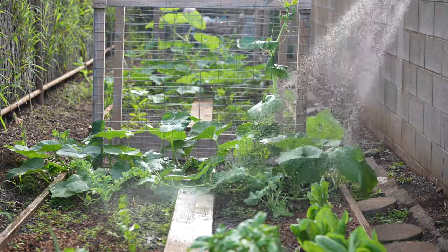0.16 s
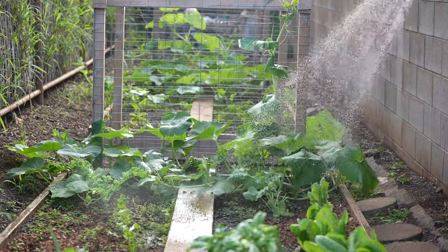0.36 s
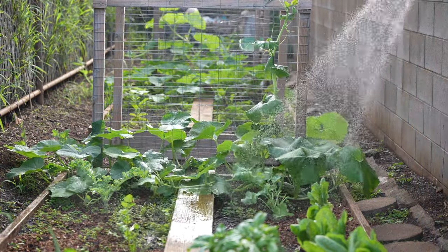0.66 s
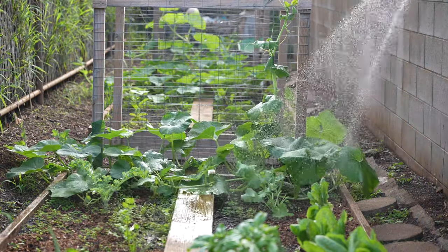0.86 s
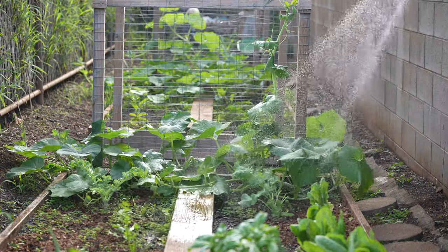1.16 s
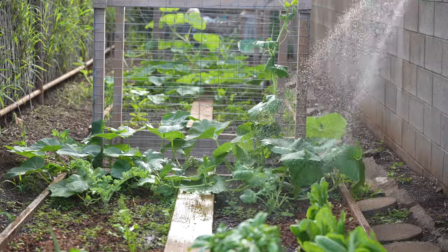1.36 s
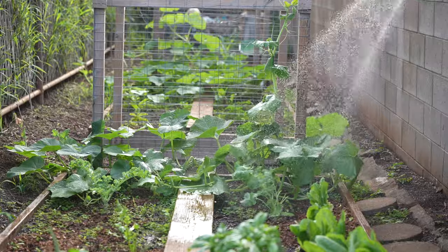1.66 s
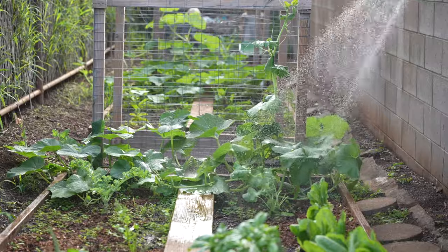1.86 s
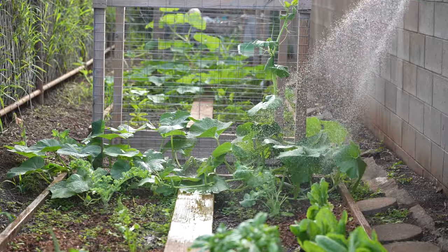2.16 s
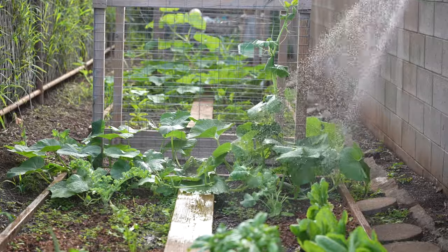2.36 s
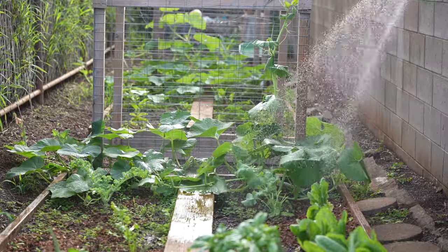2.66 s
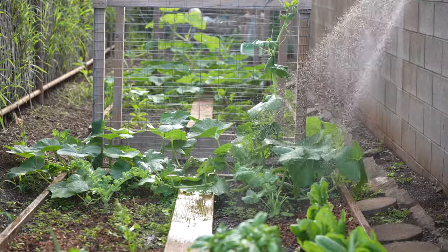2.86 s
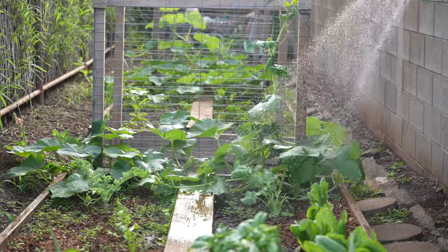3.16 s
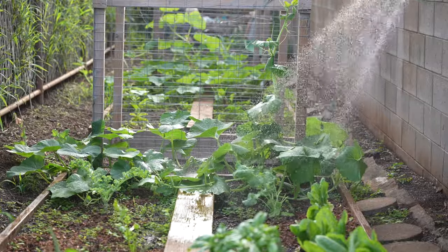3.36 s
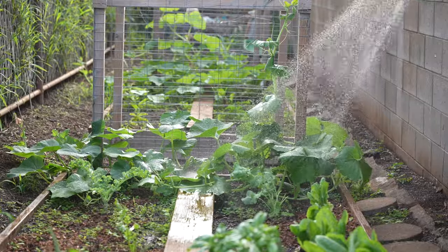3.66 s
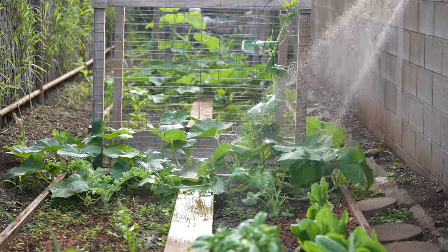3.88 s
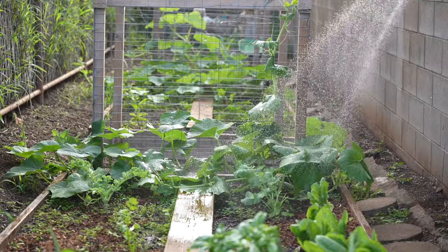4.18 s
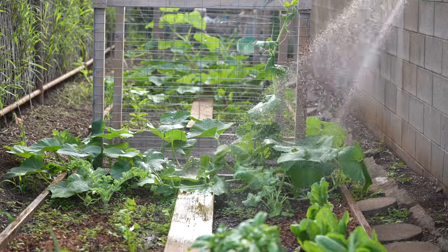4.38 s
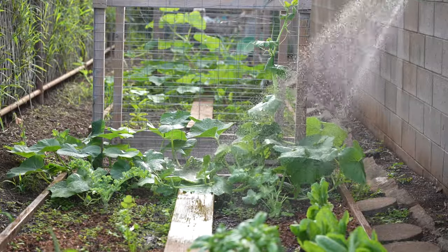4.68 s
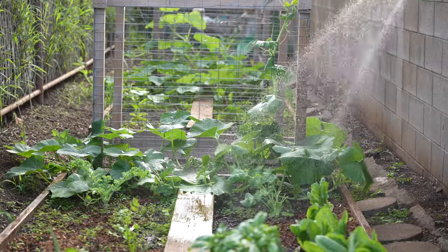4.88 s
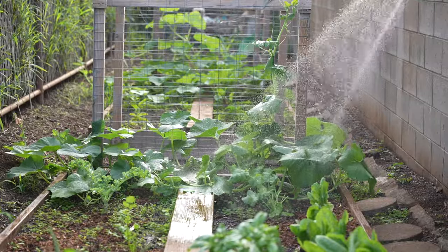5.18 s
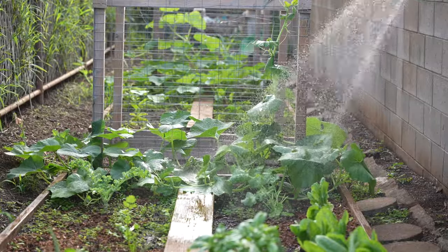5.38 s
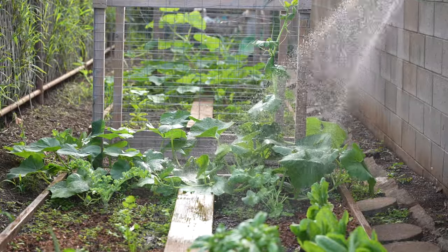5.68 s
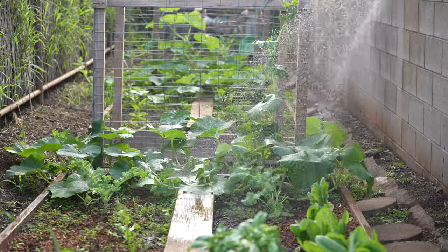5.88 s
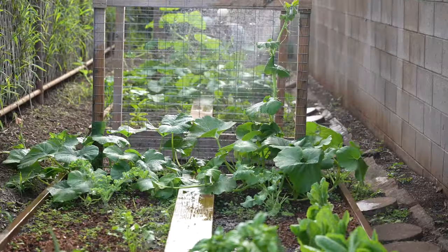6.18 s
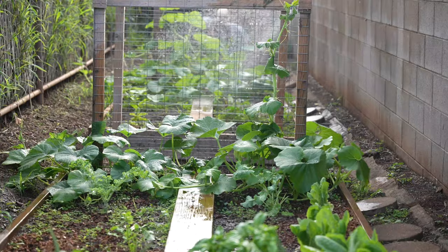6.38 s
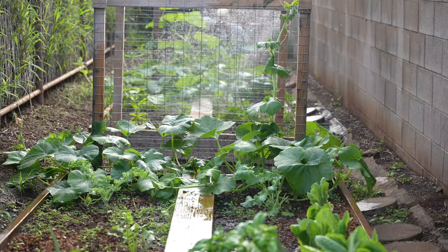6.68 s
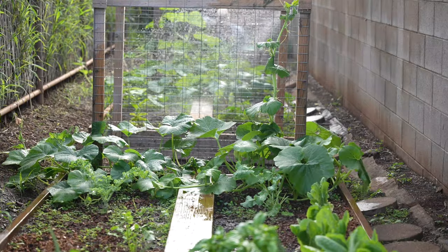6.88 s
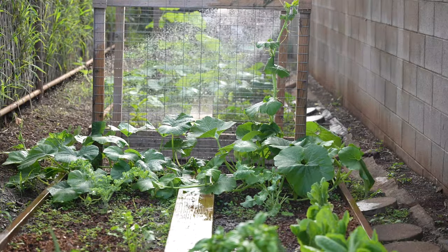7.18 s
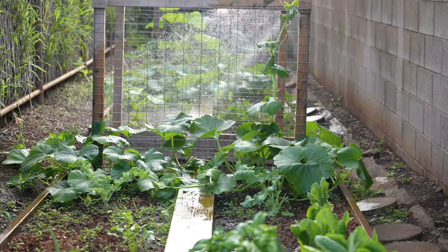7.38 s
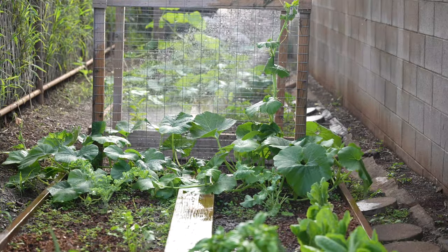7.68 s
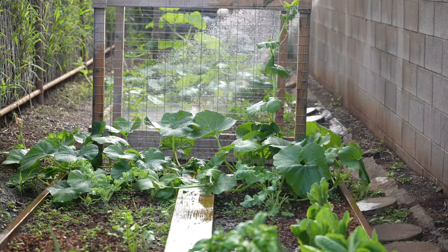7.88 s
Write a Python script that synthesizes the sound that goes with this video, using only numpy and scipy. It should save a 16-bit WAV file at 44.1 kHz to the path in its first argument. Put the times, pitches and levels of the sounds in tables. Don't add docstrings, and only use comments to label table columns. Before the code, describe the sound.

A bright, nearly constant water spray, slightly stronger on the right, wets leaves and ground close to a small camera. Low wind blasts and sharp flapping thuds hit its unprotected microphone, densest in the early part, then easing. A short descending bird whistle sounds faintly before an abrupt scene change; the spray moves further back, traffic rumble increases, and fresh gusts bump the microphone over a faint motor hum.

```python
import sys
import numpy as np
from scipy import signal
from scipy.fft import rfft, irfft, next_fast_len
from scipy.io import wavfile
from scipy.ndimage import uniform_filter1d

SR = 44100
rng = np.random.default_rng(int(sys.argv[2]) if len(sys.argv) > 2 else 0)


def to_wav(sig):
    pcm = np.clip(np.atleast_2d(sig), -1, 1) * 32767
    pcm = np.round(pcm).astype(np.int16)
    wavfile.write(sys.argv[1], SR, pcm.T)


def makeup_ratio(level_db):
    decades = np.asarray(level_db, float) / 20
    return 10 ** decades


N = 354563
T = np.arange(N) / SR
M = next_fast_len(N)
HZ = np.arange(M // 2 + 1) * SR / M + 1e-3

CUT_S = 6.205
TOWN_NEAR_DB, TOWN_FAR_DB = -18, -8.5
NOZZLE_NEAR_DB, NOZZLE_FAR_DB = -25.7, -28.3
SPLASH_NEAR_DB, SPLASH_FAR_DB = -5.4, -7.6
SPLASH_FOLLOWS = .95
SWAY_DB = -0.76
BREEZE_NEAR_DB, BREEZE_FAR_DB = (-43, -50, -56), (-33, -43, -48)
EDDY_LAG_S = 0.0012
DUCK_ATTACK_S, DUCK_RETURN_S, CREEP_DB_PER_S = .03, .05, 2.9
TOP_HZ = 15760

# (frequency [Hz], density [dB per Hz])
TOWN_COLOUR = [(41, -34), (70, -1), (79, 4), (87, 1), (129, -2.5), (313, -14.5), (500, -33), (650, -43),
               (1100, -120)]
# (time [s], pitch [Hz], level [dB])
MOTOR_DRONE = [(0, 61.5, -31.5), (.4, 62.3, -40.5), (.6, 62.8, -25.5), (.9, 62.5, -30.5),
               (1.1, 63.2, -32.5), (1.35, 62.8, -36.5), (3.1, 62.2, -39), (3.6, 62.3, -29.5),
               (4.25, 63, -36.5), (4.5, 62.9, -50), (4.8, 63.4, -37), (5.25, 62.7, -46), (5.9, 63.2, -38),
               (6.2, 62, -51)]
# (time [s], pitch [Hz], level [dB])
MOTOR_HUM = [
    (6.21, 321, -59),
    (6.8, 321, -53),
    (6.95, 322, -52),
    (7.2, 321, -48.5),
    (7.4, 321, -55),
    (7.6, 321, -47),
    (8.04, 321, -59),
]
# (time [s], pitch [Hz], level [dB])
BIRD_WHISTLE = [
    (5.15, 2520, -57),
    (5.2, 2500, -48),
    (5.22, 2400, -48),
    (5.25, 2370, -41),
    (5.31, 2340, -41),
    (5.34, 2360, -50),
    (5.38, 2330, -43),
    (5.46, 2250, -41),
    (5.48, 2230, -58),
]
# (frequency [Hz], density [dB per Hz])
GUST_COLOUR = [(7.1, -39), (12, 2), (38, 0), (137, -9.5), (240, -16), (299, -22.5), (413, -27),
               (490, -35.5), (700, -30.5), (910, -41), (1540, -120)]
# (time [s], time to fall 10 dB [s], level [dB])
AIR_HEAVES = [(.29, .2, -32), (.47, 0.2, -30), (.59, 0.2, -30), (1.03, -0.2, -33), (1.23, 0.08, -26.5),
              (1.5, 0.1, -26), (1.59, .06, -20), (1.72, 0.17, -17.5), (1.98, 0.13, -24),
              (2.12, 0.05, -19.5), (2.23, 0.02, -20), (2.35, 0.06, -22), (2.47, 0.14, -29),
              (2.69, .06, -26), (2.85, .17, -25), (3.24, .06, -30), (3.56, 0, -24.5), (3.71, 0.04, -20.5),
              (3.83, 0, -20.5), (3.94, -0.06, -19), (4.68, 0.6, -28), (4.95, 0, -31.5), (5.62, .15, -34),
              (6.22, .07, -29), (6.42, .15, -26), (6.61, 0.02, -16.5), (6.87, 0.04, -17.5),
              (7.1, .08, -27.5), (7.25, 0.14, -30), (7.46, 0.3, -27.5)]
# (time [s], time to fall 10 dB [s], buffet [dB], flutter over buffet [dB])
BODY_EDDIES = [(.54, .07, -38, -13), (1.23, 0, -38, -15), (1.45, -0.0154, -24, 2),
               (1.526, 0.02, -18.5, -2.5), (1.64, .07, -25.5, 4), (1.75, .07, -31, -17),
               (1.95, .04, -27, 0.5), (1.99, 0.03, -21.5, -20), (2.095, .04, -22.5, -20),
               (2.19, 0.08, -27, -3.5), (2.31, 0.03, -20, -21), (2.41, 0.0558, -22, -1),
               (2.48, 0.0352, -19, -18), (2.6, 0.06, -25, -15), (2.84, .06, -31, -28),
               (3.65, 0.02, -28.5, -23.5), (3.73, .08, -27, -20), (3.94, .05, -32, -18),
               (4.93, 0.18, -38.5, -15), (4.66, .1, -43, -12), (6.22, .06, -42, -2), (6.5, 0.03, -43, 0),
               (6.61, -0.04, -34, -8), (6.67, -0.01, -21, -13), (6.81, .04, -23, -2), (7.1, 0, -34, -14),
               (7.24, 0.1, -32.5, -7), (7.43, 0.05, -30.5, -13), (7.79, -0.2, -37, -12),
               (8.03, .04, -37, -20)]
# (time [s], peak [dB], swing rate [Hz])
AIR_SLAPS = [(1.447, -14, 200), (1.538, -15, 120), (1.601, -14, 150), (1.665, -18, 151), (1.941, -11, 160),
             (1.965, -17, 70), (2.096, -11.5, 90), (2.128, -15, 40), (2.286, -11.5, 59.6),
             (2.321, -17, 120.5), (2.473, -12, 150), (3.238, -20, 45), (3.668, -19, 70), (3.712, -19, 50),
             (3.803, -18, 60), (3.836, -16, 60), (3.908, -19, 45), (6.221, -14.5, 69.4), (6.67, -15, 90),
             (6.808, -12, 250)]
# (time [s], depth [dB], quick return [dB])
GAIN_DUCKS = [(0, 1.8, -0.4), (.55, .7, .1), (.8, 1, .1), (1.05, .4, 0.8), (1.45, 2.2, 0), (1.54, 8.8, 2.8),
              (1.63, 7.8, 3.3), (2.0, 8, 3), (2.12, 9.3, 3.2), (2.3, 9.3, 4.2), (2.46, 8, 1.2),
              (2.95, 5.7, .9), (3.55, 3.8, .1), (3.72, 4.3, 1.4), (4.25, 2.8, .7), (4.72, 2.3, 1.7),
              (5.0, 1.3, 1.7), (5.95, .6, 0.17), (6.23, 2.6, 0), (6.39, 3.5, 1.6), (6.62, 2, 4),
              (6.69, 2.4, 1.2), (7.3, 1, .1), (7.5, 1, 0.5)]
# (delay left [s], delay right [s], share of the direct sound [0-1])
EARLY_ECHOES = [
    (.0023, .0021, .06),
    (.0053, .0047, .07),
    (.0087, .0095, .07),
    (.0131, .0119, .07),
]
# (frequency [Hz], likeness [0-1])
PORT_LIKENESS = [(300, .75), (700, .75), (1400, .6), (3000, .33), (6000, .36), (10000, .42), (15000, .46)]
# (frequency [Hz], lead [rad])
PORT_LEAD_NEAR = [(300, 0.31), (1640, -0.38), (4400, -2), (10500, -1.54), (11500, -1), (13600, -2.1),
                  (15400, -2.03)]
PORT_LEAD_FAR = [(300, -0.39), (1720, 0.36), (3300, -1.1), (5000, -0.037), (5600, -0.43), (9000, -2.2),
                 (11000, -1.4), (14200, -0.91)]
# (time [s], patter over the hiss [dB])
JET_AIM = [(0, -10.5), (.2, -8), (.33, -6), (.64, -6), (1.35, -5.6), (1.6, -6.8), (2.45, -7.5), (3.3, -7.2),
           (4.2, -7.1), (5.2, -6), (5.8, -7), (6.19, -9.5), (6.22, -6.5), (6.45, -4.2), (6.7, -7.5),
           (7.05, -9), (7.5, -8.5), (8.04, -10)]
# (frequency [Hz], left [dB per Hz], right [dB per Hz])
LEAF_COLOUR_NEAR = [(300, -10.5, -10), (400, -11.5, -10), (780, -7.5, -2), (1000, -9, -3.5),
                    (1220, -6.5, -2), (1400, -7.5, -3.5), (1660, -4.5, 0), (1900, -5, -1.5),
                    (2300, -6.5, -4.5), (3200, -9.5, -9), (3750, -11.5, -8.5), (4100, -10, -7),
                    (4450, -11, -5), (4800, -9, -5.5)]
LEAF_COLOUR_FAR = [(300, -1.5, 0), (430, -5.5, -3.5), (780, -9, -9), (960, -9.5, -10.5), (1200, -8, -3.5),
                   (1420, -8.5, -8), (1650, -7, -3.5), (1800, -8, -4), (2000, -10, -9), (2370, -13, -10),
                   (2750, -12, -9.5), (3350, -13, -10.5), (3900, -15, -13.5), (4780, -10, -6)]
# (frequency [Hz], left [dB per Hz], right [dB per Hz])
HISS_COLOUR_NEAR = [(4200, -10.5, -7), (5150, -8, -5), (5500, -10, -5.5), (7450, -11.5, -5.5),
                    (8000, -8.5, -4), (8800, -6.5, 0), (9200, -9, -2.5), (10000, -7.5, .5), (11200, -6, -1),
                    (11600, -7.5, -3.5), (12800, -7.5, -4), (13300, -7.5, -1), (14300, -1.5, -.5),
                    (15000, -3.5, -4)]
HISS_COLOUR_FAR = [(4200, -16, -13.5), (4600, -13.5, -10.5), (5200, -8.5, -6), (6200, -14, -7.5),
                   (7000, -13, -7), (8100, -13, -5.5), (8600, -12, -3.5), (10300, -9.5, -3),
                   (10800, -11, -5.5), (11400, -11, -3.5), (11900, -11, -6), (13400, -9.5, -2.5),
                   (14250, -5.5, -3), (14700, -8.5, -5.5)]


def along_hz(table):
    hz, *columns = np.transpose(table)
    return np.array([np.interp(np.log(HZ), np.log(hz), c) for c in columns])


def along_time(table):
    s, *columns = np.transpose(table)
    return [np.interp(T, s, c) for c in columns]


def band(lo_hz, hi_hz, steep=12):
    lows = 1 + (lo_hz / HZ) ** steep
    highs = 1 + (HZ / hi_hz) ** steep
    return np.sqrt(1 / lows / highs)


def unit(gain, pair):
    x = irfft(gain * pair, M)[:, :N]
    return x / np.std(x.mean(axis=0))


def walk(rate_hz):
    hold = int(SR / rate_hz)
    steps = np.repeat(rng.standard_normal(N // hold + 1), hold)
    x = uniform_filter1d(uniform_filter1d(steps, hold), hold)[:N]
    return x / np.std(x)


def drops(spread_db):
    size = np.minimum(rng.exponential(size=M), 7)
    return rfft(rng.standard_normal(M) * makeup_ratio(spread_db * size))


def at_ports(sources, alike, lead):
    shared, left, right = sources
    alike = np.clip(alike, 0, 1)
    shift = np.exp(1j * lead * np.array([[1], [0]]))
    return np.sqrt(alike) * shared * shift + np.sqrt(1 - alike) * np.array([left, right])


def town(level_db):
    traffic = at_ports([drops(spread_db=0) for _ in range(3)], 0.99, 0)
    return makeup_ratio(level_db + 2.8 * walk(3.09)) * unit(makeup_ratio(along_hz(TOWN_COLOUR)), traffic)


def tone(table, wander, waver_db):
    hz, db = along_time(table)
    on = uniform_filter1d(1. * (T >= table[0][0]) * (T <= table[-1][0]), size=400)
    phase = 2 * np.pi * np.cumsum(hz * (1 + wander * walk(15.))) / SR
    return on * np.sqrt(2) * makeup_ratio(db + waver_db * walk(8.6)) * np.sin(phase)


def motors():
    return tone(MOTOR_DRONE, wander=0.022, waver_db=1.5) + tone(MOTOR_HUM, wander=0.0057, waver_db=2.5)


def bird():
    return tone(BIRD_WHISTLE, wander=.003, waver_db=.7)


def gusts(rows):
    out = np.zeros(N)
    for s, fall_s, db in rows:
        near = slice(max(int((s - 4 * fall_s) * SR), 0), int((s + 4 * fall_s) * SR))
        out[near] += makeup_ratio(2 * db - 20 * np.abs(T[near] - s) / fall_s)
    return out


def wind():
    out, lumps = 0, walk(30.)
    air = [drops(spread_db=0) for _ in range(3)]
    heave = gusts(AIR_HEAVES)
    buffet = gusts([row[:3] for row in BODY_EDDIES])
    flutter = gusts([(s, fall_s, db + over_db) for s, fall_s, db, over_db in BODY_EDDIES])
    edges_hz = [(8, 51.6), (55, 137.5), (150, 680)]
    likeness, lump_depth_db = [.88, .6, .5], [.5, 1.2, 2.2]
    layers = zip((heave, buffet, flutter), BREEZE_NEAR_DB, BREEZE_FAR_DB, edges_hz, likeness, lump_depth_db)
    for power, near_db, far_db, edges, alike, lump_db in layers:
        eddies = at_ports(air, alike, -2 * np.pi * HZ * EDDY_LAG_S)
        breeze = makeup_ratio(2 * np.where(T < CUT_S, near_db, far_db))
        strength = np.sqrt(power + breeze) * makeup_ratio(lump_db * lumps)
        out = out + strength * unit(makeup_ratio(along_hz(GUST_COLOUR)) * band(*edges), eddies)
    return out


def slaps():
    out = np.zeros((2, N))
    for s, db, hz in AIR_SLAPS:
        near = slice(int((s - .05) * SR), int((s + .05) * SR))
        turn = (T[near] - s - EDDY_LAG_S * np.array([[.3], [-.3]])) * hz
        out[:, near] += 1.16 * makeup_ratio(db) * np.tanh(9 * turn) * np.exp(-(turn / 0.41) ** 2)
    return out


def gain_db():
    out = np.zeros(N)
    for s, depth_db, quick_db in GAIN_DUCKS:
        late = np.maximum(T - s, 0)
        back_db = quick_db * (1 - np.exp(-late / DUCK_RETURN_S)) + CREEP_DB_PER_S * late
        duck_db = depth_db * np.clip(1 + (T - s) / DUCK_ATTACK_S, 0, 1)
        out = np.maximum(out, duck_db - back_db)
    return -out


def garden():
    ripple = [sum(row[2] * np.exp(-2j * np.pi * HZ * row[k]) for row in EARLY_ECHOES) for k in range(2)]
    return 1 + np.array(ripple)


def splash(water, colour, flow, level_db, patter_db):
    level_db = level_db + SPLASH_FOLLOWS * patter_db + 0.25 * flow + 0.17 * walk(4.9)
    return makeup_ratio(level_db) * unit(makeup_ratio(along_hz(colour)) * band(2600, 4950), water)


def patter(water, colour, flow, patter_db):
    level_db = patter_db + 0.11 * flow + 0.42 * walk(9.)
    return makeup_ratio(level_db) * unit(makeup_ratio(along_hz(colour)) * band(174, 2227), water)


def hiss(water, colour, flow):
    level_db = 0.7 * flow + 0.19 * walk(12.)
    return makeup_ratio(level_db) * unit(makeup_ratio(along_hz(colour)) * band(5770, 17760), water)


def spray(leaves, nozzle, lead, town_db, nozzle_db, splash_db):
    patter_db = along_time(JET_AIM)[0]
    sources = [drops(spread_db=2.5) for _ in range(3)]
    fine = garden() * at_ports(sources, along_hz(PORT_LIKENESS), along_hz(lead))
    flow = 0.4 * walk(14.) + 0.5 * walk(60.)
    water = splash(fine, leaves, flow, splash_db, patter_db)
    water = water + patter(fine, leaves, flow, patter_db) + hiss(fine, nozzle, flow)
    sway = makeup_ratio(np.array([[SWAY_DB], [-SWAY_DB]]) / 2)
    return makeup_ratio(nozzle_db) * (water * sway + town(town_db))


def scene():
    after = np.clip((T - CUT_S) / 0.014 + .5, 0, 1)
    near = spray(LEAF_COLOUR_NEAR, HISS_COLOUR_NEAR, PORT_LEAD_NEAR,
                 TOWN_NEAR_DB, NOZZLE_NEAR_DB, SPLASH_NEAR_DB)
    far = spray(LEAF_COLOUR_FAR, HISS_COLOUR_FAR, PORT_LEAD_FAR,
                TOWN_FAR_DB, NOZZLE_FAR_DB, SPLASH_FAR_DB)
    garden_sound = makeup_ratio(gain_db()) * (np.sqrt(1 - after) * near + np.sqrt(after) * far)
    return garden_sound + wind() + slaps() + motors() + bird()


def patchy(x, patchy_db):
    hz, _, z = signal.stft(x, SR, nperseg=2048)
    bins, frames = len(hz), z.shape[2]
    depth = rng.exponential(size=(2, bins // 3 + 1, frames // 3 + 1)) - 1
    depth = np.repeat(np.repeat(depth, 3, axis=1), 3, axis=2)[:, :bins, :frames]
    gain = makeup_ratio(-patchy_db * depth * (hz[:, None] > 900))
    return signal.istft(z * gain, SR, nperseg=2048)[1][:, :N]


def roll_off(x):
    return signal.sosfilt(signal.butter(12, 17030, fs=SR, output="sos"), x)


def record(dry):
    soft = patchy(np.tanh(1.09 * dry) / 1.106, patchy_db=4.0)
    low_pass = np.clip((TOP_HZ - HZ) / 60, 0, 1)
    mix = irfft(rfft(soft, M) * low_pass, M)[:, :N]
    return roll_off(mix)


dry = scene()
out = record(dry)
to_wav(out)
```